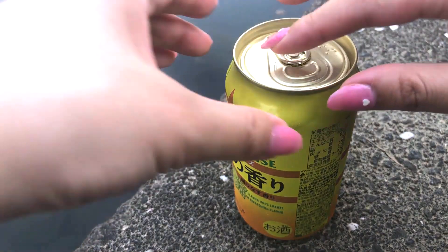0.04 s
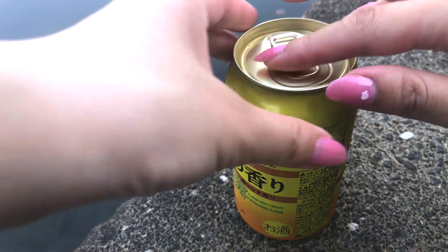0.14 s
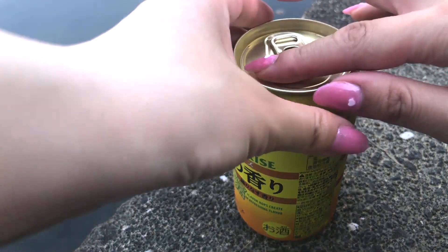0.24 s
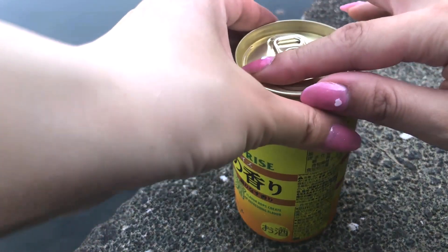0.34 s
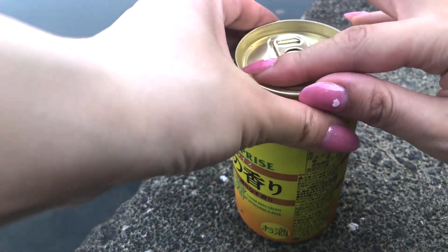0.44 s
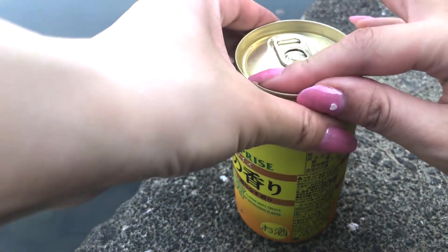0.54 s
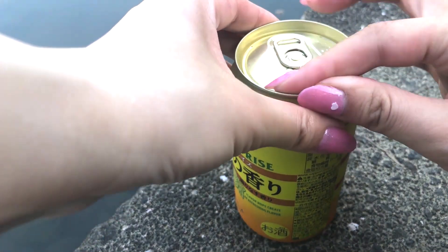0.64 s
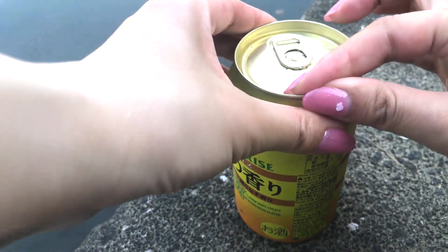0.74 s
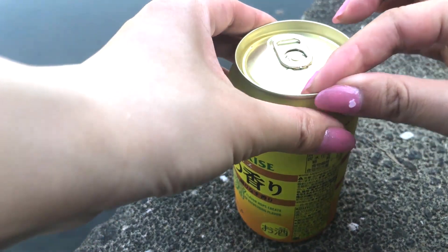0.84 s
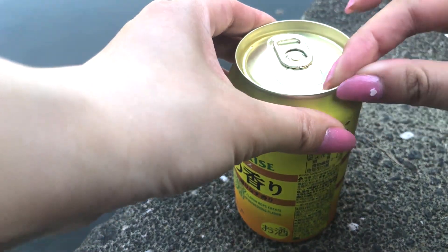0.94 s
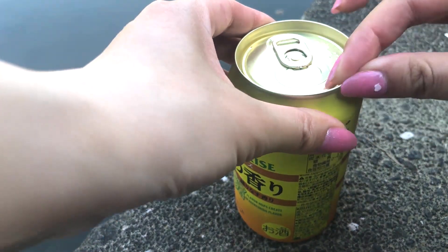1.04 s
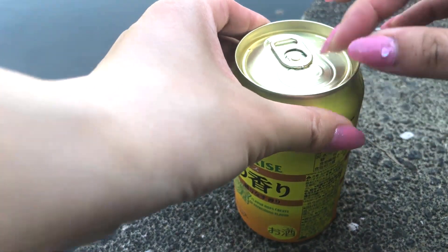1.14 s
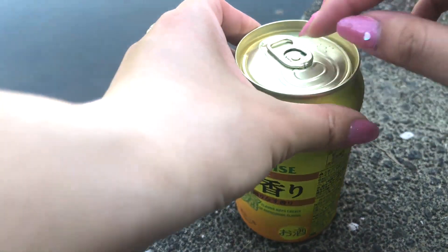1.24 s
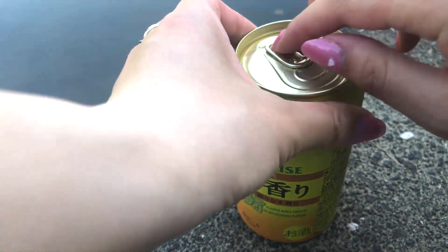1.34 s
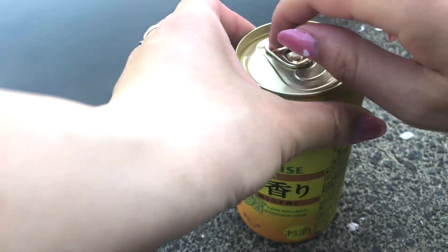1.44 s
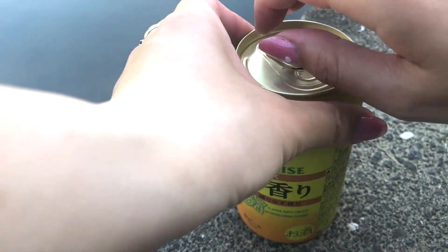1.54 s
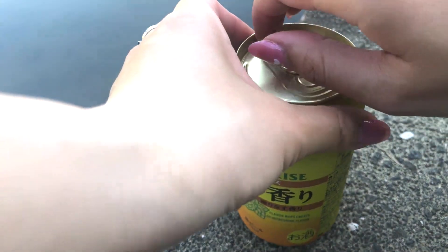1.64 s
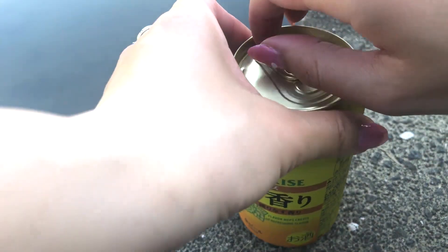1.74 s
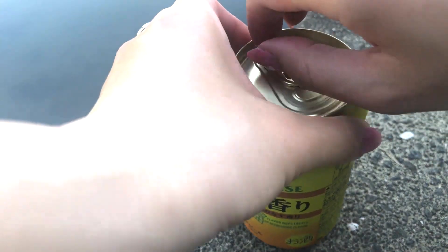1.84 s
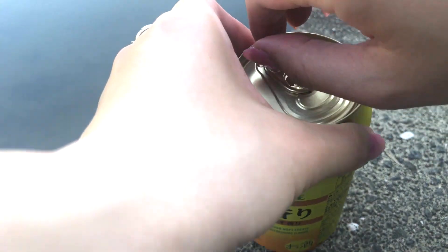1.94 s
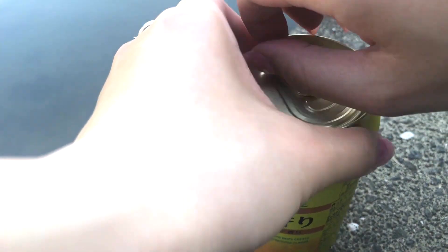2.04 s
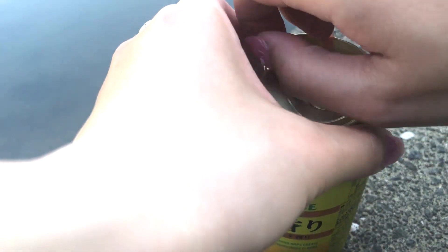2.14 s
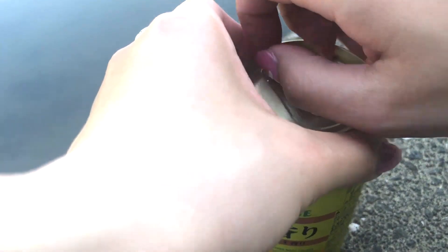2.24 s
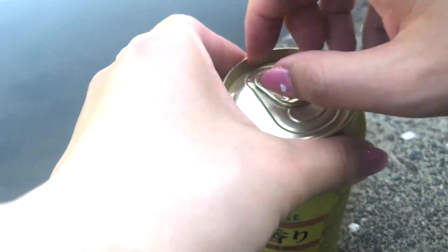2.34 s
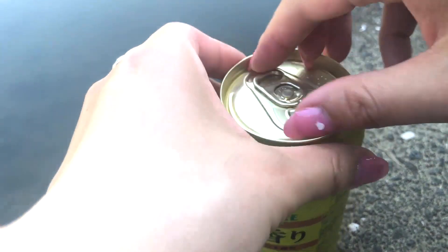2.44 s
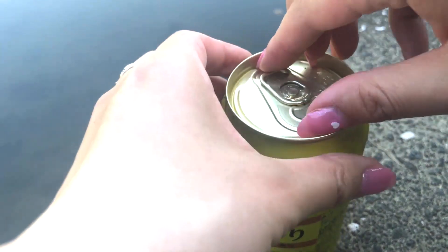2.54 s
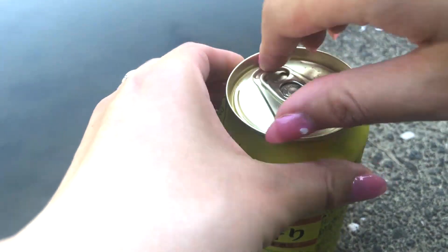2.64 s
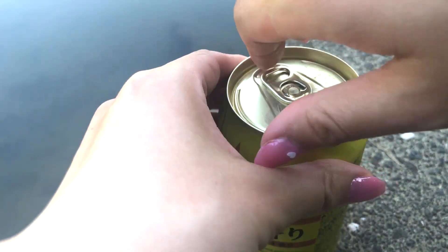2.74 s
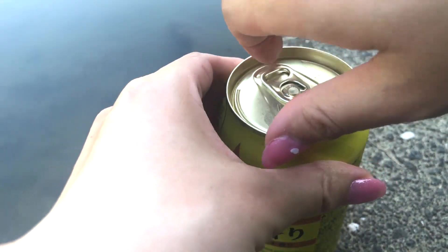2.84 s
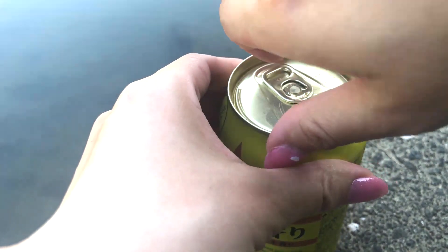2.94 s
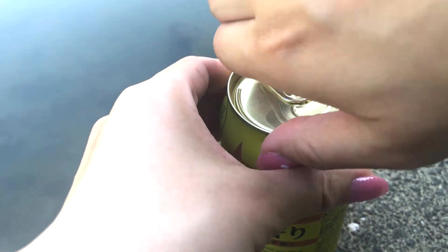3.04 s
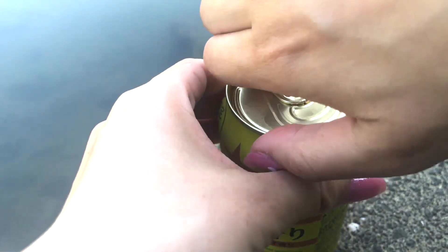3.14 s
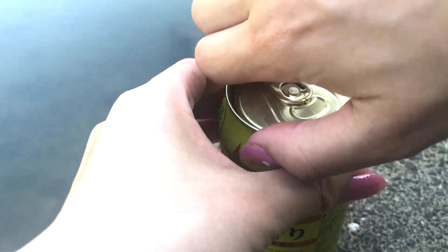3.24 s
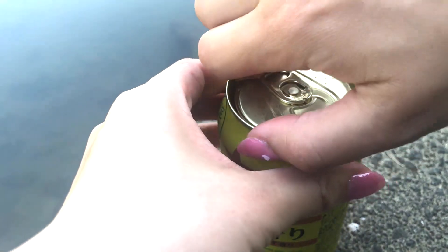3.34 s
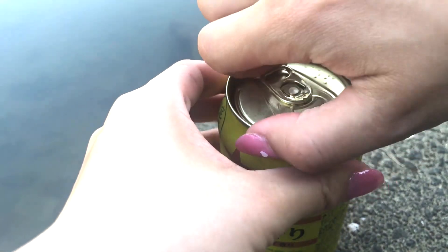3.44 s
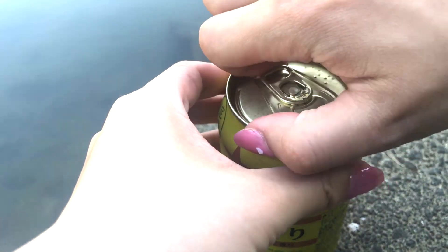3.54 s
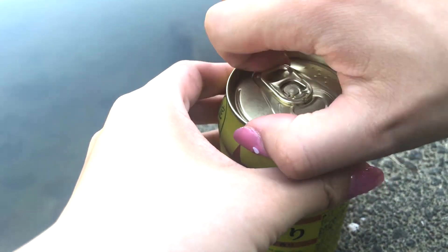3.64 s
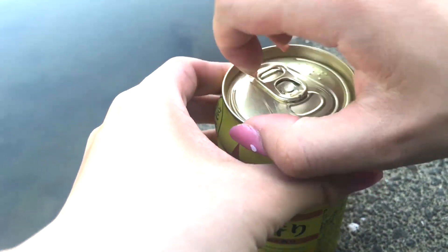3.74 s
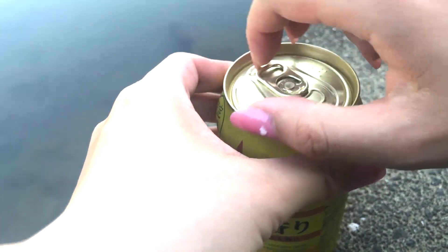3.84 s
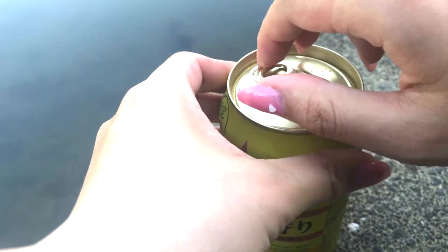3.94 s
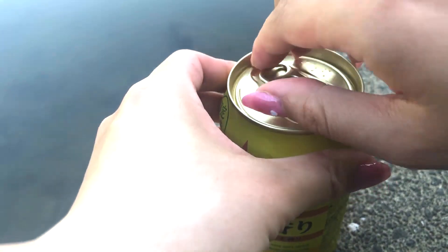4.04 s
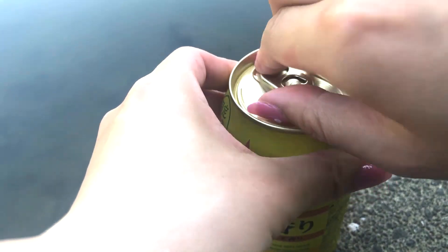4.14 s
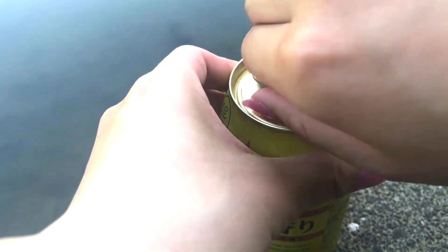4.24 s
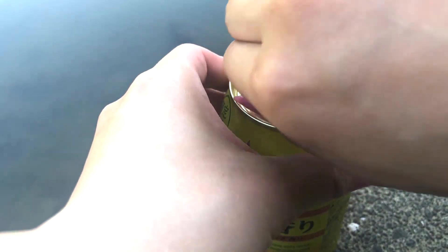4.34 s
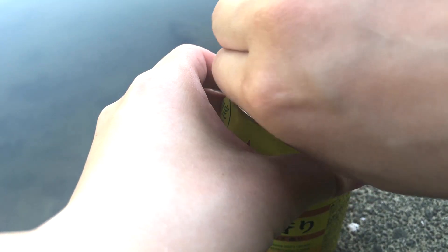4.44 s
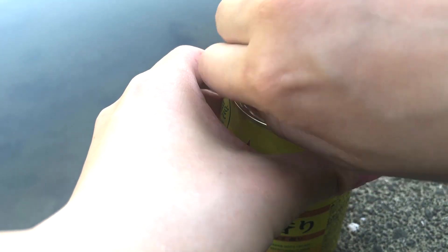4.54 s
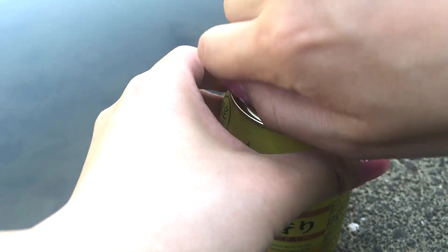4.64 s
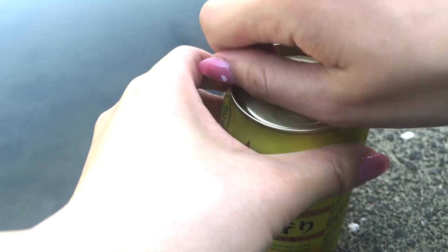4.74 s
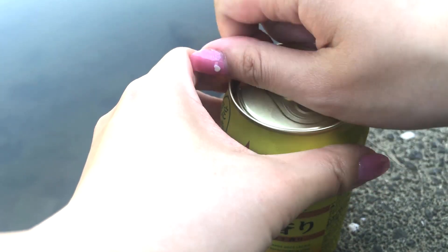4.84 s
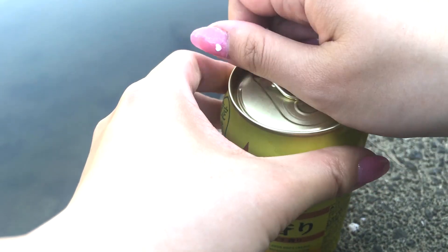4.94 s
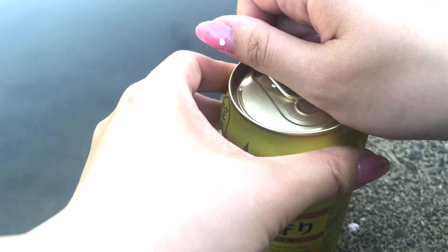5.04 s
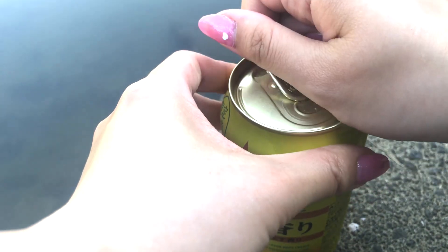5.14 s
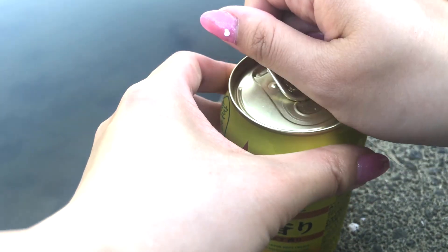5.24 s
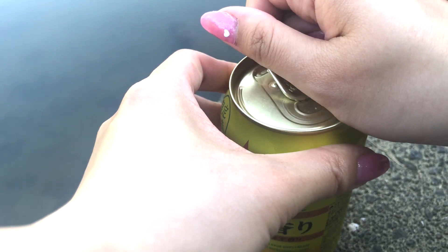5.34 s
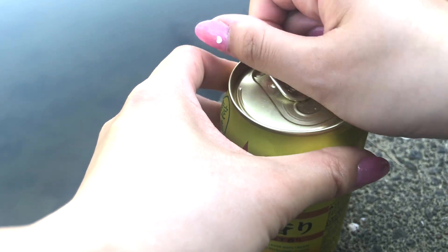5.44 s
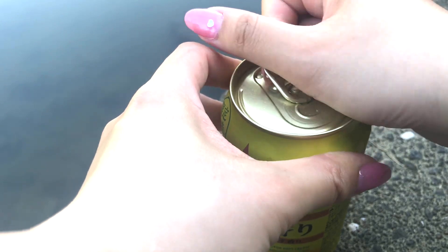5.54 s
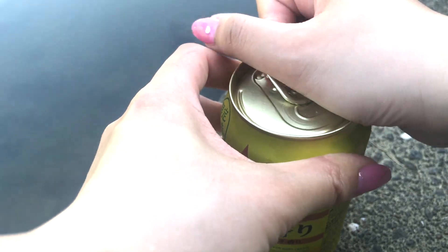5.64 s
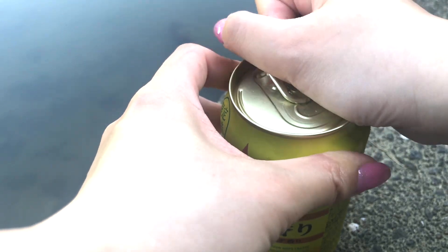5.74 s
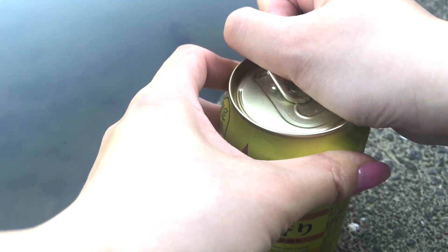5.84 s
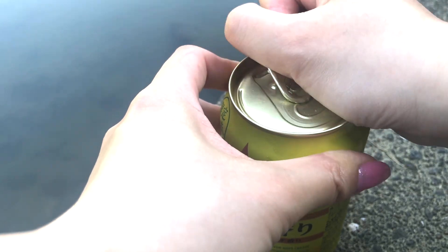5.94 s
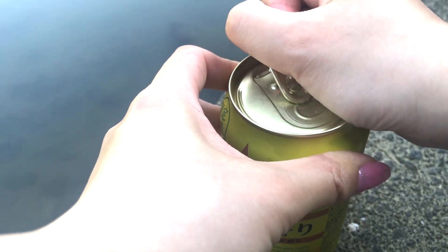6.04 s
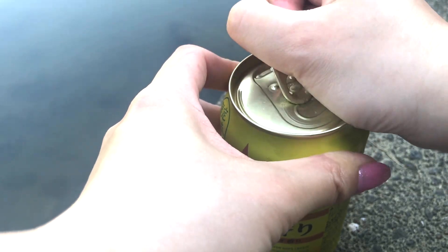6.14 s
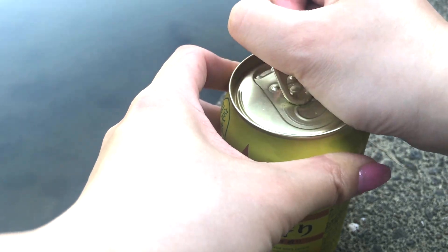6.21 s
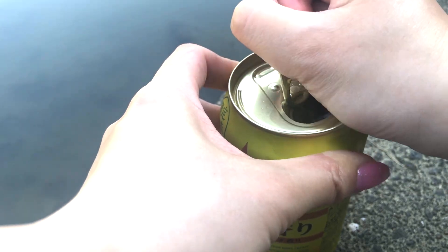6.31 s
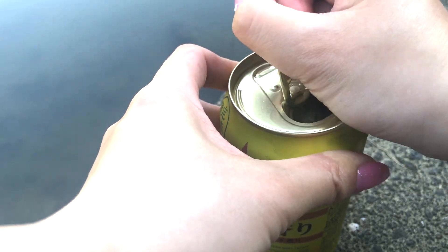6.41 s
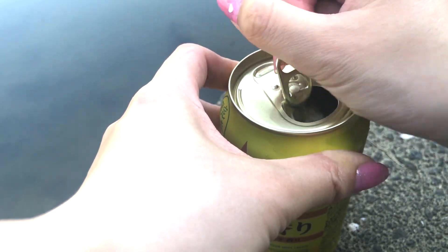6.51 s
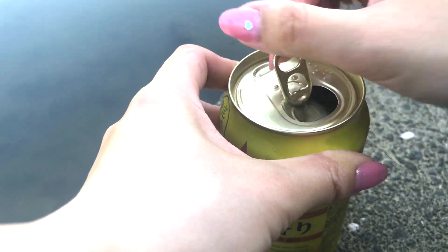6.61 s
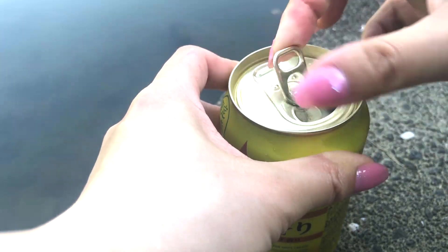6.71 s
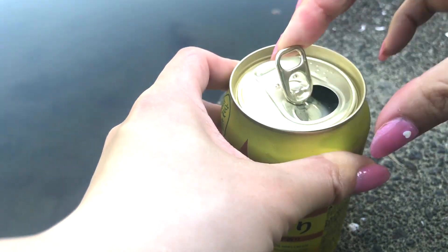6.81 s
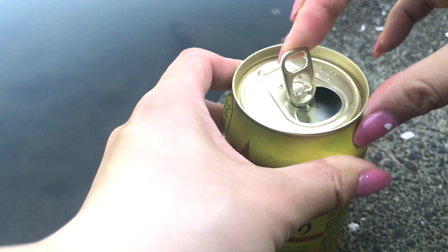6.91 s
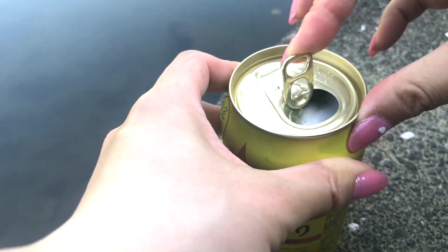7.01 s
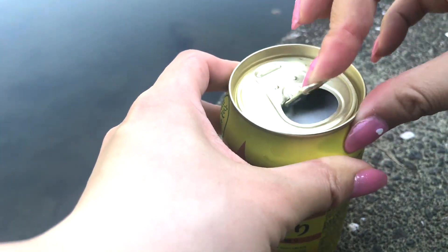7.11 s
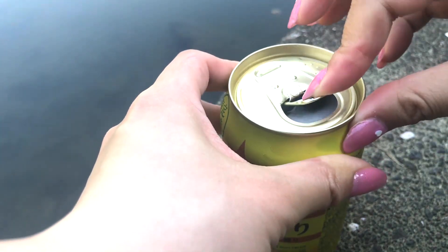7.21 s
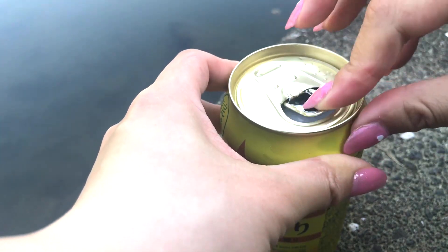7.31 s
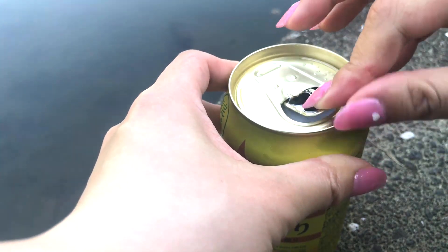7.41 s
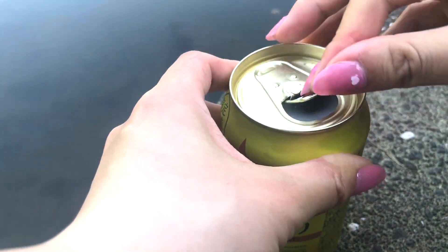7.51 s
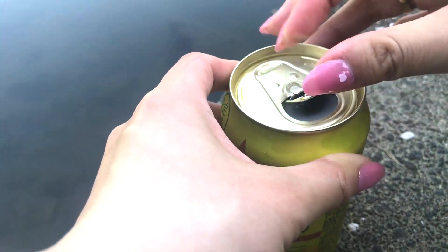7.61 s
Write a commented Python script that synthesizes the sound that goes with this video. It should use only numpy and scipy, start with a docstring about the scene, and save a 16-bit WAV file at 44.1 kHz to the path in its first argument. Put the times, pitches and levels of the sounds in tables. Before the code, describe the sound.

A faint, steady outdoor wash of river and soft low rumble lies under everything; the can is close and dry. A crisp nail tick at 0.25 s is followed by tiny taps, soft rubs and faint squeaks, with a scrape near 1.4. The springy tab slips with short, damped metallic twangs at 1.7, 2.1 and 2.4. Light ticks and dull knocks follow to 3.5, then a scrape and sharp double snap at 3.8. Soft knocks come at 4.2. At 5.17 the seal cracks and a bright gas hiss bursts for about a tenth of a second, then a tick at 5.3 with a knock, another at 5.57. From 6.15 to 6.4 sharp metallic snaps and a rapid ripping run tear the panel, with tiny fizz and a deep, short puff. The background dips and slowly recovers; sparse faint ticks and a little scrape end around 7.6.

```python
"""Concrete river bank, quiet outdoor wash throughout; a drink can close to a small camera's microphone.
First, long fingernails (struck lid modes) tick, rub and scrape on the aluminium lid; soft knocks join in.
Nails then pluck the springy pull tab, damped modes with a chatter, and the lid snaps lightly.
The seal cracks and gas hisses out as shaped noise; the scored panel tears open in a run of snaps.
The last pushes a low puff of air at the microphone; the gain control ducks and slowly recovers."""
import sys
import numpy as np
from scipy import signal
from scipy.fft import rfft, irfft, next_fast_len
from scipy.io import wavfile
from scipy.ndimage import map_coordinates

SR = 44100
rng = np.random.default_rng(int(sys.argv[2]) if len(sys.argv) > 2 else 0)


def generate_wav(sig):
    """Save sig (samples, or channels by samples) to the path in sys.argv[1] as 16-bit PCM at SR."""
    pcm = np.round(np.clip(np.atleast_2d(sig).T, -1, 1) * 32767).astype(np.int16)
    wavfile.write(sys.argv[1], SR, pcm)


N = 338247
T = np.arange(SR // 4) / SR  # time base of one hit, s

# Open air in bands: low edge f/Hz, high edge f/Hz, level/dB, fast waver/dB
AIR_BANDS = [(20, 200, -68, .7), (201, 700, -67.5, 1.53), (694, 3000, -68, 1.1), (2997, 7000, -69.5, 1.94),
             (7000, 21000, -77, 1)]
# Spectrum of the open air, each band levelled on its own: f/Hz, level/dB
AIR_SPECTRUM = [(15, -35), (25, -18), (70, 4), (256, -2), (326, -6), (451, -4.5), (695, -13.5), (962, -9),
                (2110, -14), (2350, -16.5), (3720, -14.5), (5730, -18.5), (10400, -27), (14800, -33.5),
                (16000, -36.5)]

# Fingertips rubbing on the can: t/s, length/s, level/dB
RUBS = [(0.55, 0.46, -69), (2.68, 0.08, -63), (2.84, 0.34, -61.5), (3.28, 0.049, -56), (4.72, 0.22, -67)]
# Gas and froth in the slit: t/s, length/s, level/dB
FROTH_SWELLS = [(5.57, 0.13, -62.5), (6.20, 0.055, -44), (6.352, 0.054, -33.5), (6.37, .13, -55.5)]
# Spectrum of fine grains: f/Hz, level/dB
GRIT_SPECTRUM = [(800, -17), (2200, 2.5), (3500, 0), (6000, -0.5), (10000, -7.5), (15500, -9)]

# Nails dragging over the lid and making it sing faintly: t/s, length/s, level/dB, f/Hz
SQUEAKS = [(0.36, 0.12, -64, 1480), (0.663, 0.21, -66, 3220), (1.238, 0.13, -66, 1480),
           (2.953, 0.075, -65, 2800), (4.044, .1, -63.5, 1230), (5.573, 0.18, -63.5, 1530)]

# Nails scraping over lid and tab, before the scrape mix: t/s, length/s, level/dB
SCRAPES = [(0.189, 0.097, -60), (1.405, 0.079, -49.5), (1.59, 0.041, -53.5), (2.055, 0.15, -66),
           (2.36, 0.057, -61.5), (2.67, 0.031, -59.5), (2.942, 0.11, -63), (3.799, 0.076, -45.5),
           (3.857, 0.14, -59), (7.624, 0.059, -58)]
# Lid modes that a scrape feeds most: f/Hz, level/dB, t60/s before the length factor
SCRAPED_MODES = [(2230, 0.5, 0.027), (3200, -4, 0.042), (3970, -8, 0.033)]
SCRAPED_MODES_DB = 1.5  # against the rest of the lid
CATCHES_PER_S, CATCH_SCATTER_DB = 660, 4.5  # a sliding nail sticks and slips

# Light, hard ticks on the lid: nail taps, and the sharp edge of some knocks and snaps:
# t/s, level/dB, tilt/dB per octave, note of the spot f/Hz
TICKS = [(0.2110, -44.5, 0, 1940), (0.2506, -23, 1, 8900), (0.6033, -46, -3, 2040),
         (0.6780, -43, -1.5, 1930), (0.8380, -48, 7, 9000), (1.4045, -46.5, -5, 2230),
         (1.4350, -36.5, -2, 2260), (1.4811, -39.5, -1.5, 6140), (1.613, -44, -6.5, 2300),
         (1.775, -41.5, 5, 5300), (2.165, -47, -5, 5200), (2.5298, -42, -2.5, 5300),
         (2.754, -45.5, -4, 2250), (3.0836, -45.5, -3.5, 1290), (3.7912, -44, -1, 2300),
         (3.804, -32, 2, 6000), (4.1396, -39, -0.2, 5300), (4.236, -45, -5, 5100), (5.151, -44.5, 1, 7000),
         (5.2981, -23, -5.5, 5360), (5.3475, -40.5, -5.5, 1900), (5.5993, -46.5, -5, 5200),
         (6.017, -42, -8, 1796), (6.3735, -23, 1, 5900), (6.4003, -17.5, 2.5, 5730), (6.6455, -44, 0, 2290),
         (6.7130, -41, 2.5, 1890), (7.5028, -39.5, -11, 1390), (7.5421, -39.5, -3, 1200)]
SPOT_DB, SPOT_T60_S = -3, 0.0074  # the spot's note, as mixed into a tick
# Modes of the lid: f/Hz, level/dB, t60/s before the length factor
LID_MODES = [(1418, -13.5, 0.033), (1767, -7.5, 0.022), (1970, -6, 0.016), (2260, -6.5, 0.018),
             (2650, -6, .014), (3180, -9, 0.031), (4640, -4, 0.019), (5300, -4.5, 0.018), (6020, -7, 0.022),
             (7080, -4.5, 0.015), (7790, -9, 0.019), (9420, -8, .016), (12220, -7, .012)]
# Spectrum of a bare contact on thin sheet: f/Hz, level/dB
CONTACT_SPECTRUM = [(300, -31), (900, -22), (1600, 0.5), (3000, 0), (6000, 5), (10000, 0), (16000, -7)]
RADIATE_HZ = 1200  # the small lid radiates little below this

# Dull knocks of gripped can and flexing lid: t/s, level/dB, f/Hz, t60/s before its factors, body level/dB
KNOCKS = [(0.2531, -40, 450, 0.042, -7), (2.755, -41.5, 1540, 0.044, -2), (2.795, -43, 1290, 0.058, -4.5),
          (3.117, -37.5, 1223, 0.033, 1), (3.4769, -32, 740, 0.038, -6), (4.236, -36, 1281, 0.061, -1),
          (4.256, -41, 390, 0.09, -5), (5.2971, -17, 1853, 0.04, -12), (5.5653, -27, 1730, 0.054, -9),
          (6.3728, -22.5, 1796, .09, -4), (7.637, -42, 1220, .1, -5.5)]
# Spectrum of a knock's thud: f/Hz, level/dB
THUD_SPECTRUM = [(100, -16), (220, -4), (420, -1), (800, -7), (1300, -3), (2200, 0), (3200, -7), (5000, -6),
                 (8000, -14), (15000, -28)]
SOFT_HZ, SOFT_PER_PITCH = 1120, 1.6  # thud's upper edge: lowest value/Hz, and ratio to the note's pitch
# Full can standing on the concrete: f/Hz, level/dB, t60/s before the length factor
CAN_MODES = [(210, -1, 0.093), (398.7, 0.5, .12), (497, -4, 0.11), (680, -11.5, 0.064)]

# Tab slips off a nail and rings: t/s, level/dB, tilt/dB per octave, ring length factor,
# can thud level/dB before a fixed lift
PLUCKS = [(1.7251, -26.5, 8.5, 0.94, -18), (2.1233, -27.5, -7.5, 1.2, -14), (2.4228, -26, -3.5, 0.61, -11),
          (2.458, -35, -12, 0.78, -12), (3.8727, -39.5, -1.5, 0.52, -8)]
# Modes of the tab: f/Hz, level/dB, t60/s before the length factor
TAB_MODES = [(1426, 0, 0.15), (2025, -14, 0.29), (2230, -1.5, 0.042), (2607, -2.5, 0.059),
             (3200, -25, 0.11), (3370, -12, 0.2), (3990, -17.5, 0.12), (4600, -13, .07), (4820, -4, 0.076),
             (5220, 1, 0.031), (7070, -14, 0.059), (8600, -23, 0.047), (12060, -19, .05)]
DRAG_S, DRAG_DB = .006, -19.5  # the nail clicks on the tab just before it slips off

# Spectrum of the gas jet: f/Hz, level/dB
JET_SPECTRUM = [(1500, -11.5), (2200, -11.5), (3200, -10.5), (4700, -9), (6200, -9.5), (7400, -7),
                (10000, -6.5), (12500, -5), (15300, -1), (16000, -3)]
# Spectrum of the rush of air: f/Hz, level/dB
RUSH_SPECTRUM = [(30, -7.5), (90, -0.5), (250, 0.5), (650, 0), (1100, -3), (2200, -3), (4000, -9.5),
                 (9000, -39)]
# Lid resonances rung by the jet: f/Hz, width/Hz, level/dB
JET_WHISTLES = [(4750, 140, -4.5), (7310, 200, -0.5), (8180, 80, 1), (9440, 90, -7), (11150, 110, 7),
                (14840, 120, -1)]
CRACK_S, OPEN_S, SPENT_S = 5.174, 5.184, 5.265  # seal cracks, slit opens, pressure is spent
JET_DB, RUSH_DB = -17.5, -31.5  # at full flow, before the sag
LEAK_DB = -14  # the jet's first leak against full flow
OPENING_S, RELEASE_DB_PER_S = .003, 950  # how fast the flow starts and dies
SAG_HZ, SAG_DB, SAG_DB_PER_S = 6000, 2.5, 84  # below this pitch the jet starts strong, then sags

# Lid snaps under the tab: t/s, level/dB, panel f/Hz, tilt/dB per octave, push level/dB against the snap
SNAPS = [(3.816, -17, 3200, -4, -30), (3.834, -13, 6020, -3.6, -17), (5.1736, -11, 4570, 4.5, -15.5),
         (6.1467, -10.5, 5010, 0.5, -20.5), (6.1645, -20.5, 4750, -1, -26.5),
         (6.2012, -11, 4750, -1.1, -20.5), (6.3566, -11.5, 4350, 7.5, -14.5)]
# Score tears in evenly spaced slips: t/s, slips, gap/s, first level/dB, growth/dB per slip,
# panel f/Hz, panel level/dB, tilt/dB per octave, push level/dB against the slip
TEARS = [(6.2203, 3, .0043, -16, -4, 1853, -8, 5.5, -38.5),
         (6.3350, 8, .0033, -28, 2, 4206, -1.5, 0, -14.5)]
SNAP_RISE_S = .0002
LEAD_S, LEAD_DB = .0028, -25  # a very faint tick just before each snap
SLIP_RISE_S, SLIP_SCATTER_S = .0006, .0002

TOP_HZ = 15850  # upper limit of the camera's band


def amp(db):
    """Decibels to gain."""
    return 10 ** (np.asarray(db) / 20)


def unit(x):
    """Scale to rms 1."""
    return x / np.sqrt(np.mean(x ** 2) + 1e-20)


def blow(x):
    """Scale a hit to the energy of one millisecond at full level."""
    return x / np.sqrt(np.sum(x ** 2) * 1000 / SR + 1e-20)


def colour(points, hz):
    """Gain of (Hz, dB) points on a log axis."""
    f, db = np.transpose(points)
    return amp(np.interp(np.log(hz + 1), np.log(f), db))


def filtered(x, response):
    """x times a response of frequency."""
    m = next_fast_len(len(x) + 8192)
    spectrum = rfft(x, m) * response(np.fft.rfftfreq(m, 1 / SR))
    return irfft(spectrum, m)[:len(x)]


def noise(response, size):
    """Coloured noise of rms 1."""
    return unit(filtered(rng.standard_normal(size), response))


def wobble(rate):
    """A smooth random curve, rate knots a second."""
    knots = rng.standard_normal(int(N * rate / SR) + 4)
    return map_coordinates(knots, [np.arange(N) * rate / SR])


def add(track, s, x):
    """Mix x into the track at time s."""
    part = track[max(round(s * SR), 0):][:len(x)]
    part += x[:len(part)]


def swelling(length):
    """A stroke that rises and falls smoothly over length seconds."""
    return np.hanning(max(int(length * SR), 8))


def fade(t60):
    """Exponential decay by 60 dB in t60 seconds."""
    return amp(-60 * T / max(t60, 1e-4))


def slope(hz, tilt_db):
    """Tilt in dB per octave about 4 kHz, flat below 1 kHz; harder contacts favour high frequencies."""
    return amp(tilt_db * np.log2(np.maximum(hz, 1000) / 4000))


def tone(hz, t60):
    """One damped mode."""
    return np.sin(2 * np.pi * hz * T) * fade(t60)


def ring(modes, tilt_db, length):
    """Damped modes, struck at slightly new strengths each time."""
    out = np.zeros(len(T))
    for hz, db, t60 in modes:
        strength = rng.choice([-1, 1]) * amp(db + rng.normal(0, 1.7))
        out += strength * slope(hz, tilt_db) * tone(hz, t60 * length)
    return blow(out)


def crack(tilt_db, t60, tail_db, tail_t60):
    """The dense, quickly dying upper modes of thin sheet, with a faint longer shimmer."""
    sheet = noise(lambda hz: colour(CONTACT_SPECTRUM, hz) * slope(hz, tilt_db), len(T))
    return blow(sheet * (fade(t60) + amp(tail_db) * fade(tail_t60)))


def radiated(x):
    """The lid's vibration as it reaches the air, thin in the bass."""
    return signal.sosfilt(signal.butter(2, RADIATE_HZ, "highpass", fs=SR, output="sos"), x)


def outdoors():
    """Far rumble, the wash and splash of the river and a soft hiss, each drifting on its own."""
    out = np.zeros(N)
    for lo, hi, db, waver_db in AIR_BANDS:
        wash = noise(lambda f: colour(AIR_SPECTRUM, f) * (f >= lo) * (f < hi), N)
        drift_db = .25 * wobble(3) + waver_db * wobble(16)
        out += amp(db + drift_db) * wash
    return out


def grit(strokes, clump_db, tilt_db):
    """Swells of tiny clumped grains: noise whose level flickers at random."""
    swells = np.zeros(N)
    texture = noise(lambda f: colour(GRIT_SPECTRUM, f) * slope(f, tilt_db), N)
    grains = unit(texture * amp(clump_db * wobble(500) + 2.74 * wobble(45)))
    for s, length, db in strokes:
        add(swells, s, amp(db) * swelling(length))
    return swells * grains


def rubs():
    """Fingertips rub on the can in bright, clumped grains."""
    return grit(RUBS, clump_db=6.0, tilt_db=5)


def squeaks(sharpness):
    """Friction feeds one narrow resonance of the lid."""
    out = np.zeros(N)
    for s, length, db, hz in SQUEAKS:
        swell = swelling(length)
        song = noise(lambda f: 1 / (1 + (sharpness * (f / hz - 1)) ** 2), len(swell))
        add(out, s, amp(db) * swell * song)
    return out


def scrapes():
    """A sliding nail catches at random; every catch rings the lid, over a swell of fine grit."""
    out = np.zeros(N)
    for s, length, db in SCRAPES:
        strengths = amp(CATCH_SCATTER_DB * rng.standard_normal(len(T)))
        catches = (rng.random(len(T)) < CATCHES_PER_S / SR) * strengths
        favoured = ring(SCRAPED_MODES, tilt_db=0, length=0.91)
        answer = ring(LID_MODES, tilt_db=0, length=1.7) + amp(SCRAPED_MODES_DB) * favoured
        swell = swelling(length)[:len(T)]
        rasp = signal.fftconvolve(catches, radiated(answer))[:len(swell)]
        add(out, s, amp(db) * swell * unit(rasp))
    return amp(-2.0) * out + amp(-5) * grit(SCRAPES, clump_db=4.5, tilt_db=1.5)


def tick(tilt_db, hz):
    """One light, hard tick of the lid's modes and sheet; each spot favours its own note."""
    sheet = crack(tilt_db, t60=0.0036, tail_db=-16.0, tail_t60=0.043)
    metal = amp(-7.0) * ring(LID_MODES, tilt_db, length=0.62) + sheet
    spot = amp(SPOT_DB) * blow(tone(hz, t60=SPOT_T60_S))
    return blow((metal + spot) * (1 - fade(0.0023)))


def ticks():
    """Light, hard ticks on the lid: nail taps, and the sharp edge of some knocks and snaps."""
    out = np.zeros(N)
    for s, db, tilt_db, hz in TICKS:
        add(out, s, amp(db) * tick(tilt_db, hz))
    return out


def knocks():
    """Soft blows: one rough, hand-damped note over the can's thud and hum; higher notes, brighter thud."""
    out = np.zeros(N)
    for s, db, hz, t60, body_db in KNOCKS:
        corner_hz = max(SOFT_HZ, SOFT_PER_PITCH * hz)
        waver = .3 * wobble(300)[:len(T)]  # radians; roughens the note
        note_fade = fade(t60 * .4) + amp(-11) * fade(t60 * 1.74)
        note = blow(np.sin(2 * np.pi * hz * T + waver) * note_fade)
        soft = noise(lambda f: colour(THUD_SPECTRUM, f) / (1 + (f / corner_hz) ** 4), len(T))
        thud = blow(soft * (fade(t60 * 1.8) + amp(-14) * fade(0.2)))
        # soft blows move the whole can
        hum = amp(-8) * (2000 / corner_hz) * ring(CAN_MODES, 0, length=0.95)
        body = amp(body_db) * (thud + hum)
        add(out, s, amp(db) * blow((note + body) * (1 - fade(.008))))
    return out


def tab():
    """The springy tab chatters on the lid, more with a brighter pluck, rings on and jolts the can."""
    out = np.zeros(N)
    for s, db, tilt_db, length, thud_db in PLUCKS:
        spring = ring(TAB_MODES, 0.82 * tilt_db - 0.5, length)
        rattle = crack(0.73 * tilt_db - 4.0, t60=0.024, tail_db=-10, tail_t60=0.086)
        chatter = amp(-5 + 0.49 * tilt_db) * rattle
        thud = amp(thud_db + 1.5) * ring(CAN_MODES, 0, length=0.26)
        add(out, s, amp(db) * blow(spring + chatter + thud) * (1 - fade(0.0025)))
        add(out, s - DRAG_S, amp(db + DRAG_DB) * tick(tilt_db=-3, hz=2230))
    return out


def froth():
    """Gas and froth fizz in the slit as short swells of grains."""
    return grit(FROTH_SWELLS, clump_db=3.5, tilt_db=0)


def gas():
    """A sputtering jet leaks, bursts out, thins and dies with the pressure; it rings the lid, buffets the air."""
    t = np.arange(N) / SR
    shut = np.clip(1 - (t - OPEN_S) / OPENING_S, 0, 1)  # 1 while only leaking, 0 at full flow
    spent_db = -RELEASE_DB_PER_S * np.maximum(t - SPENT_S, 0)
    sag_db = -SAG_DB_PER_S * np.maximum(t - OPEN_S, 0)

    def ringing(f):
        bands = [amp(db) * 1j * f * w / (c * c - f * f + 1j * f * w) for c, w, db in JET_WHISTLES]
        return 1 + sum(bands)

    hiss = noise(lambda f: colour(JET_SPECTRUM, f) * ringing(f) * f / (f + 600), N)
    low = filtered(hiss, lambda f: 1 / (1 + (f / SAG_HZ) ** 8))
    thinning = hiss - low + amp(SAG_DB + sag_db) * low
    jet = amp(JET_DB + LEAK_DB * shut + spent_db + 0.93 * wobble(350)) * thinning
    rush_db = RUSH_DB + .7 * LEAK_DB * shut + spent_db + sag_db + 1.3 * wobble(120)
    rush = amp(rush_db) * noise(lambda f: colour(RUSH_SPECTRUM, f), N)
    return (jet + rush) * (t > CRACK_S)


def push(corner_hz):
    """The low thump of the snap, its bass trailing by about a cycle."""
    def thump(hz):
        trailing = np.exp(-2j * np.pi * np.log(hz + 1))
        return trailing * hz / (hz + 50) / (1 + (hz / corner_hz) ** 2)

    return blow(filtered(1. * (T == 0), thump))


def snap(panel_hz, panel_db, tilt_db, push_db, rise, length):
    """One snap rings the lid and the scored panel at its own pitch, over a low thump."""
    panel_tone = tone(panel_hz, t60=0.0054 * length) + amp(-11.5) * tone(panel_hz, t60=0.022 * length)
    panel = amp(panel_db) * blow(panel_tone)
    sheet = crack(tilt_db, t60=.0035 * length, tail_db=-24, tail_t60=0.034 * length)
    metal = amp(-5) * ring(LID_MODES, tilt_db, length=0.63 * length) + sheet
    tear = 1 - np.exp(-(T / max(rise, 1e-5)) ** 2)  # the crack takes a moment to run along the score
    return blow(radiated((panel + metal) * tear)) + amp(push_db) * push(corner_hz=800)


def lid():
    """Single snaps as the tab levers the lid, and quick runs of damped slips as the score tears."""
    out = np.zeros(N)
    for s, db, panel_hz, tilt_db, push_db in SNAPS:
        hit = snap(panel_hz, 0.3, tilt_db, push_db, rise=SNAP_RISE_S, length=0.96)
        add(out, s, amp(db) * hit)
        add(out, s - LEAD_S, amp(db + LEAD_DB) * tick(tilt_db, panel_hz))
    for s, slips, gap, db, growth_db, panel_hz, panel_db, tilt_db, push_db in TEARS:
        for k in range(round(slips)):
            slip_s = s + k * gap + rng.normal(0, SLIP_SCATTER_S)
            slip = snap(panel_hz, panel_db, tilt_db, push_db, rise=SLIP_RISE_S, length=.5)
            add(out, slip_s, amp(db + k * growth_db) * slip)
    return out


def puff(s, db, hz, width, glide):
    """The panel swings into the can and pumps a low puff of air that falls in pitch as it slows."""
    t = np.clip(np.arange(N) / SR - s, -.1, .1)
    cycles = hz * glide * (1 - np.exp(-t / glide))
    return -amp(db) * np.exp(-(t / width) ** 2) * np.cos(2 * np.pi * cycles)


def scene():
    """The can close by, in front of the open air."""
    touches = ticks() + scrapes() + rubs() + squeaks(sharpness=19)
    can = tab() + lid() + knocks()
    drink = gas() + froth() + puff(s=6.3775, db=-15.5, hz=68, width=0.01, glide=0.024)
    return (outdoors() + touches + can + drink)[None]


def gain_control(x, ceiling_db, recovery_db):
    """Bass above the ceiling turns the gain down at once; it returns at recovery_db a second."""
    bass = np.abs(signal.hilbert(filtered(x, lambda hz: 1 / (1 + (hz / 130) ** 8))))
    excess = np.maximum(20 * np.log10(bass + 1e-9) - ceiling_db, 0)
    climb = recovery_db * np.arange(N) / SR
    return x * amp(climb - np.maximum.accumulate(excess + climb))


def record(dry):
    """The camera microphone's gain control and band limit."""
    held = gain_control(dry[0], ceiling_db=-31, recovery_db=10)
    return filtered(held, lambda hz: 1 / (1 + (hz / TOP_HZ) ** 160))[None]


dry = scene()
out = record(dry)
generate_wav(out)
```